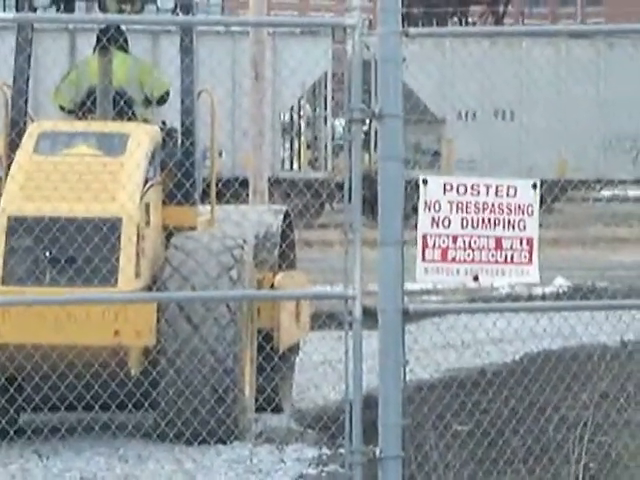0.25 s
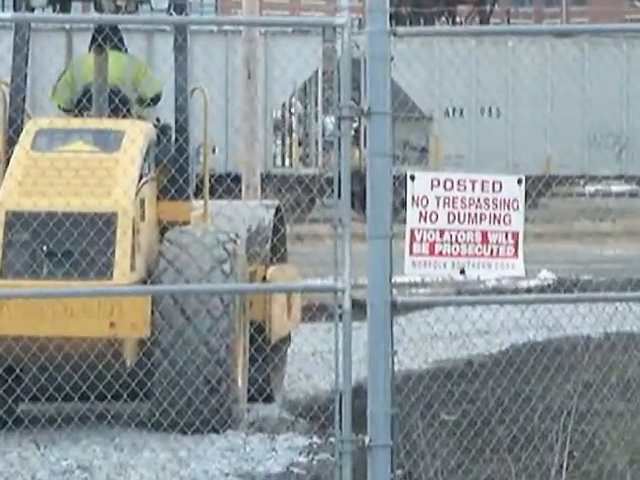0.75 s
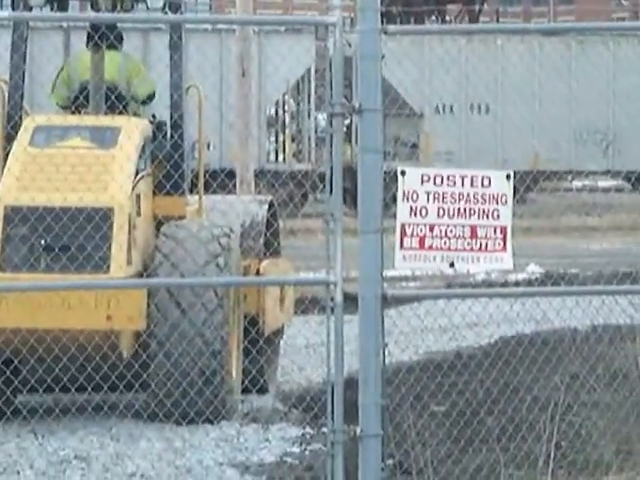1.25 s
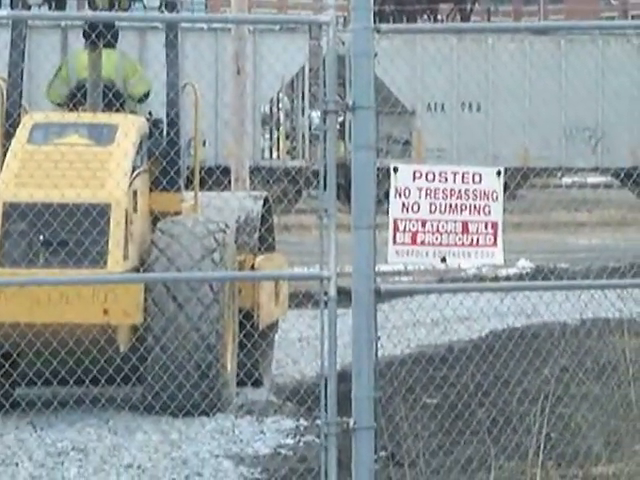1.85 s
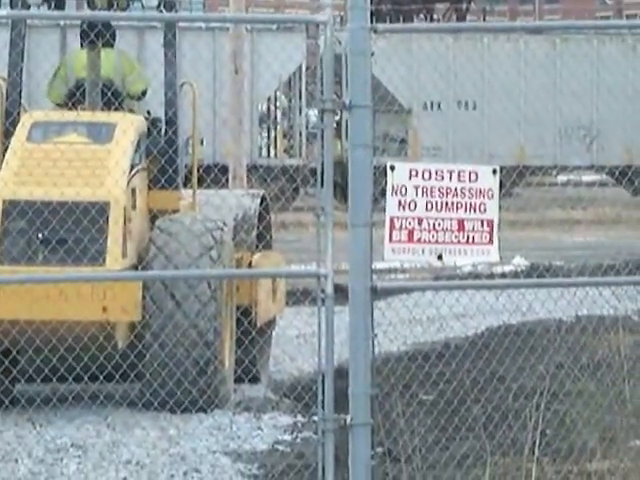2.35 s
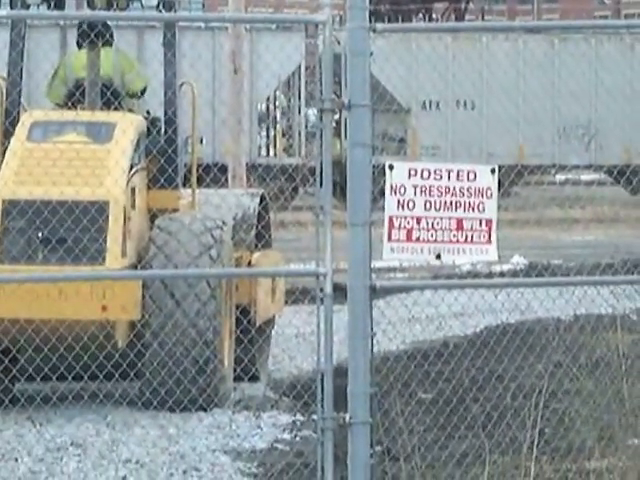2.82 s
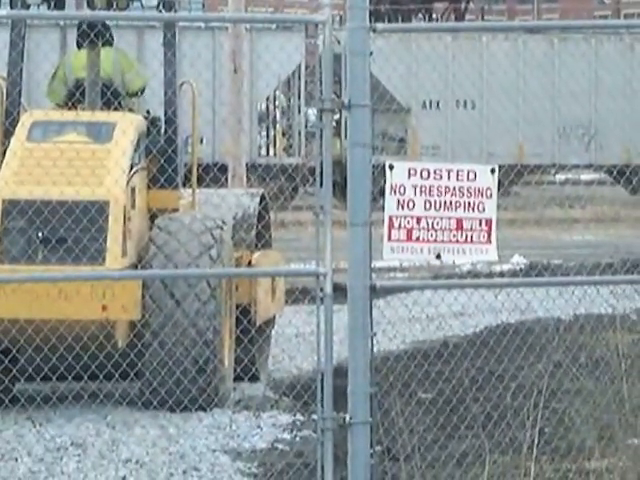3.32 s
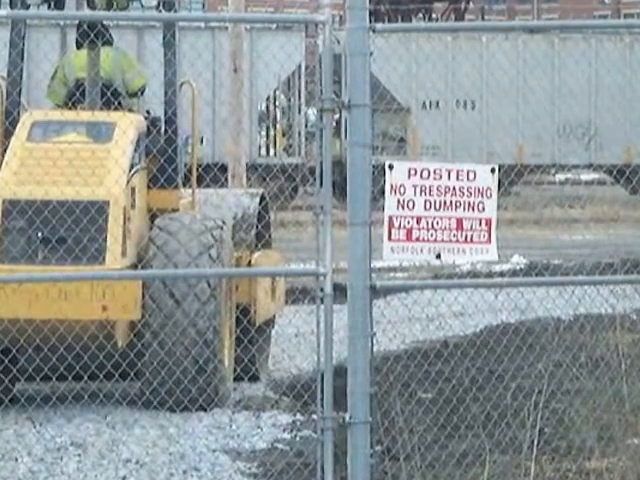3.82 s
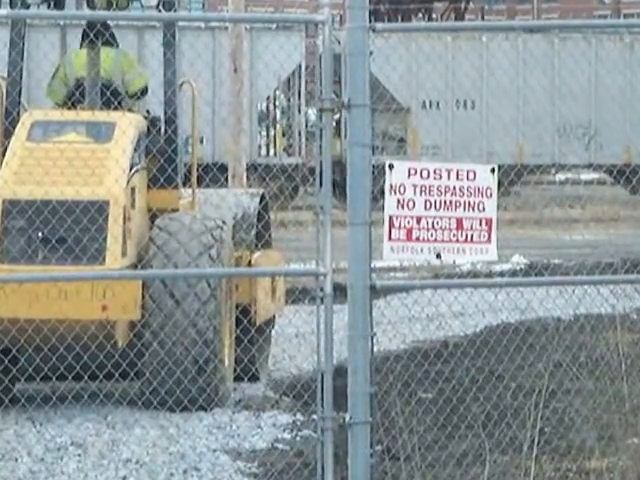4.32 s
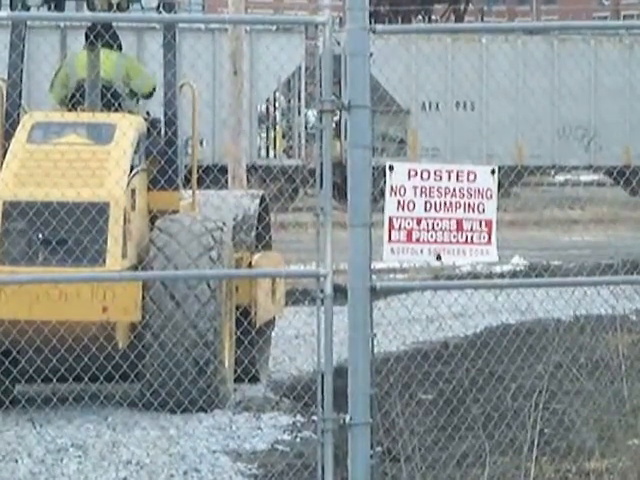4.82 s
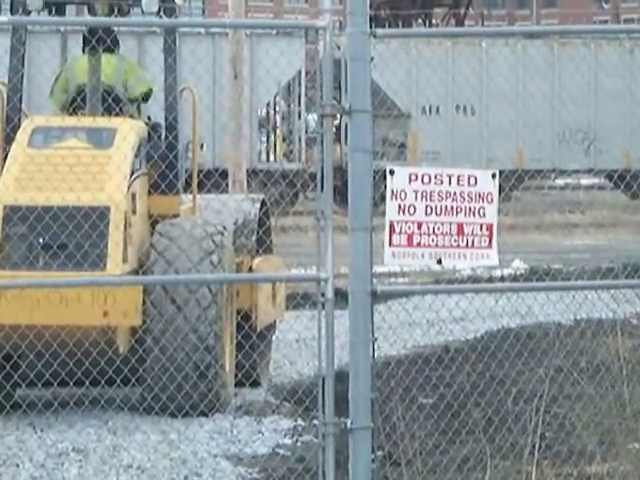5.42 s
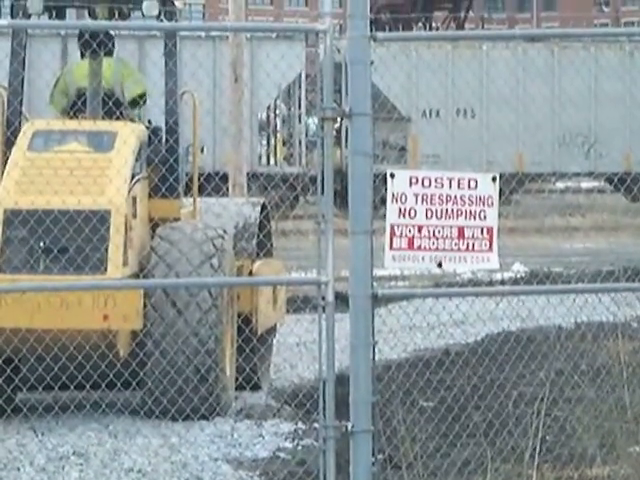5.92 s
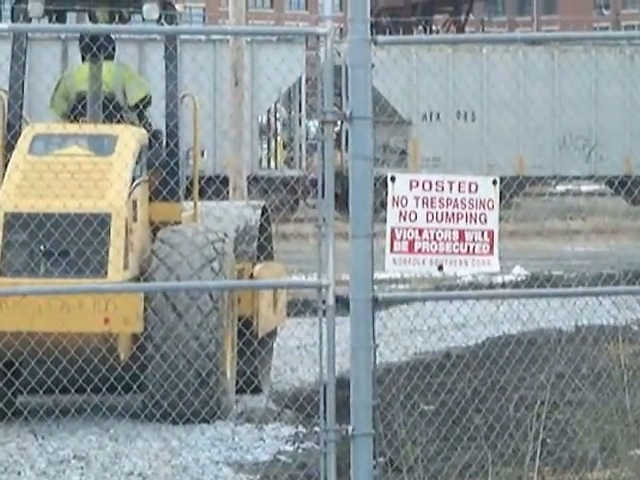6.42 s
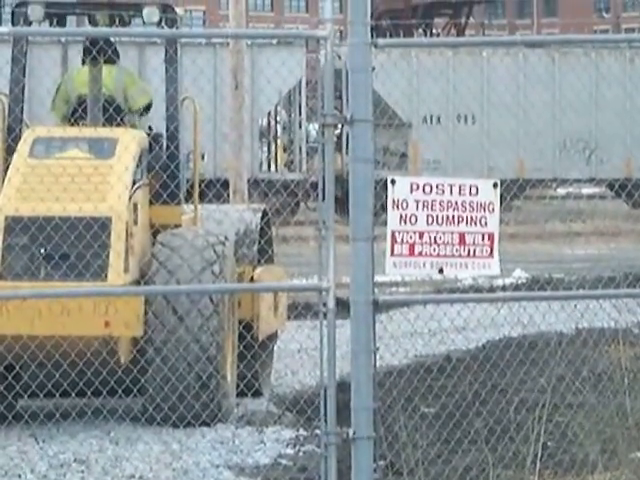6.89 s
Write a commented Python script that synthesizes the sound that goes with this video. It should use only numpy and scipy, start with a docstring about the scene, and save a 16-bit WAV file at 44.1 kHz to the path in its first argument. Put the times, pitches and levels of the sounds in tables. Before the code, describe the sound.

Strong wind rumbles, buffets and thumps against a microphone while a heavy diesel machine idles steadily behind it with a clattering rattle and faint whine.

```python
"""A road roller's four-cylinder diesel idles some way off on an open site as wind buffets the microphone.
Clatter and knocks recur with the engine cycle, over a faint whine of gears and pump locked to the crank. The
wind is shaped noise in three eddy sizes, with gusts, throbbing vortices and sharp slaps; it freshens. The
engine is heard to drop in quick steps and often to climb partly back; some steps leave it louder."""
import sys
import numpy as np
from scipy import signal
from scipy.fft import rfft, irfft, next_fast_len
from scipy.io import wavfile
from scipy.ndimage import uniform_filter1d

SR = 44100
rng = np.random.default_rng(int(sys.argv[2]) if len(sys.argv) > 2 else 0)


def dump(signal):
    """Clip the signal to [-1, 1] and save it as 16-bit WAV at the path in sys.argv[1]."""
    limited = np.clip(np.atleast_2d(signal).T, -1, 1)
    pcm = np.round(limited * 32767).astype(np.int16)
    wavfile.write(sys.argv[1], SR, pcm)


N = 315315
TIME_S = np.arange(N) / SR

# Levels are relative, ahead of normalising and trims.
# mechanical noise spectrum: [f/Hz, level per Hz/dB]
CLATTER_SPECTRUM = [(60, -4.5), (400, -2), (620, 1.5), (900, -5), (1350, -1), (1700, -5.5), (2000, -4.5),
                    (2230, -8), (2550, -1.5), (3200, -7), (3700, -10), (4300, -11), (4650, -20.5),
                    (5800, -18.5), (8000, -30)]
# part of the mechanical noise that recurs in every cycle: [f/Hz, power share/0-1]
RECURRING_SHARE = [(400, 0.6), (900, 0.9), (1400, 0.9), (2000, 0.9), (2700, 0.3), (3700, 0), (6000, 0.05)]
# treble of the mechanical noise: [t/s, level/dB]
TREBLE_CURVE = [(0, -0.3), (1.8, 0), (2.1, -1.2), (3.2, 0), (3.35, 2.5), (3.9, 0.5), (4.25, -1.1), (5.5, 1),
                (7.15, -0.5)]
TREBLE_FROM_HZ = 3300
# knocks of pistons, valves and a loose cover: [place of peak in cycle/0-1, ringing f/Hz, level/dB]
KNOCK_CONTACTS = [(0.135, 1946, -3.5), (0.149, 1685, -4.5), (.205, 2340, 3), (0.234, 2126, -6.5),
                  (0.264, 1647, 2.5), (0.27, 974, 3.5), (.312, 1972, 0.5), (0.312, 1530, -3.5),
                  (0.361, 2580, 0.5), (0.401, 2916, -5), (0.433, 1130, -2), (0.485, 4155, -6),
                  (0.516, 4130, -8), (0.55, 1830, -4), (0.604, 2436, -5), (0.67, 1967, 3.5),
                  (0.681, 3200, -21), (0.689, 1374, 7), (0.81, 1236, -0.5), (0.813, 1750, -1.5),
                  (0.858, 2594, -2.5), (.895, 1863, 0), (.935, 1097, 3.5), (0.945, 1310, 7),
                  (0.95, 2007, 2), (0.959, 1574, -0.5), (0.991, 3270, -13)]
# whine of gears and pump: [multiple of cycle rate/1, level/dB]
WHINE_ORDERS = [(68, -55), (89, -54), (91, -58), (96, -56), (103, -57), (112, -59), (118, -58), (120, -52),
                (131, -57), (132, -57), (136, -58), (140, -57), (141, -57), (143, -56), (144, -55.5),
                (153, -57), (154, -57), (155, -56), (168, -53), (203, -54), (219, -58), (239, -60),
                (258, -59), (259, -58), (267, -52), (268, -58), (279, -53), (287, -52), (294, -61),
                (336, -65), (343, -65), (450, -68)]
# steps in engine level: [t/s, initial loss/dB, lasting loss/dB (negative: louder)]
ENGINE_DIPS = [(-.12, 3.5, 0), (.5, 3.5, 1.24), (1.34, 2.5, 0.5), (1.76, 1, -0.79), (2.93, 0, 2),
               (3.19, 7.5, 3.5), (4.13, 0.5, -2), (4.77, -2, 0.76), (5.33, 6, 2), (6.36, 2, 0),
               (6.76, 1.5, -2)]
ENGINE_DB, DIP_FALL_S, RECOVER_DB_PER_S = -34, 0.093, 6.5
# idle creeps up and wanders
IDLE_RPM, CREEP_RPM_PER_S, HUNT_RPM = 1097.0, .24, .35

# big eddies: [f/Hz, level per Hz/dB]
RUMBLE_SPECTRUM = [(12, -4.5), (25, -4.5), (45, -0.5), (75, -3), (110, -8.5), (200, -42), (400, -76.5)]
# smaller eddies: [f/Hz, level per Hz/dB]
BUFFET_SPECTRUM = [(40, -34.5), (70, -9.5), (110, 4.5), (200, 1.5), (270, -7), (380, -24.5), (700, -50),
                   (2000, -76.5)]
# smallest eddies: [f/Hz, level per Hz/dB]
FLUTTER_SPECTRUM = [(120, -26), (220, -3), (300, -2), (420, -9), (600, -20), (900, -34.5), (1400, -41),
                    (3000, -42.5), (8000, -65)]
# air rasping on the edge of the port: [f/Hz, level per Hz/dB]
RASP_SPECTRUM = [(200, -21), (450, 11.5), (620, 6.5), (800, -1), (1050, -11.5), (1300, -21), (1700, -33.5),
                 (4000, -53)]
# gusts: [start t/s, hold/s, rumble level/dB, buffet level/dB, flutter level/dB]
GUST_EVENTS = [(0, 0.044, -33, -22.5, -27.5), (0.147, 0.19, -24.5, -21, -48),
               (0.421, 0.16, -30, -22.5, -38), (0.74, 0.058, -20, -20, -23.5),
               (.85, 0.025, -29, -20, -24.5), (1.019, 0.16, -31.5, -19.5, -35.5),
               (1.216, 0.16, -38, -19, -21.5), (1.435, 0.025, -29, -17.5, -28),
               (1.795, 0.081, -14.5, -19, -31.5), (1.869, 0.2, -29, -18, -25),
               (2.147, 0.069, -37, -18.5, -46), (2.289, 0.051, -21.5, -18, -28.5),
               (2.448, 0.21, -41, -26, -30), (2.647, 0.29, -27, -19, -27), (2.83, 0.023, -37, -34, -24),
               (2.972, 0.092, -23, -14, -25), (3.11, 0.12, -20, -18.5, -19), (3.29, 0.095, -26, -29, -32),
               (3.46, 0.14, -26, -21, -41), (3.665, 0.042, -20, -25, -38), (4.005, 0.022, -38, -31, -29),
               (4.105, 0.12, -22, -26, -22), (4.3, 0.093, -34, -28, -34), (4.47, 0.068, -31, -29, -24),
               (4.67, 0.18, -23, -19.5, -28), (4.925, 0.065, -38, -20, -29.5),
               (5.073, 0.019, -39, -23, -20), (5.16, 0.07, -40, -16.5, -23.5), (5.28, 0.17, -31, -22, -24),
               (5.628, 0.082, -26, -31, -25), (5.9, 0.22, -26, -24.5, -25),
               (6.035, 0.28, -22.5, -25.5, -24.5), (6.4, 0.23, -29, -26.5, -27),
               (6.677, .24, -22, -33, -23), (6.963, 0.28, -24, -22.5, -22)]
GUST_ATTACK_S, GUST_RELEASE_S = 0.026, 0.062
# drops of the breeze: [middle t/s, Gaussian half length/s, depth/dB]
BREEZE_LULLS = [(0.683, 0.04, 6), (1.532, .045, 3.5), (1.7, 0.026, 4.5), (2.087, .025, 4), (2.5, 0.058, 6),
                (3.423, 0.039, 3.5), (3.864, 0.031, 5.5), (5.556, 0.01, 0), (6.542, 0.019, 11)]
# breeze under the gusts and its growth: rumble, buffet, flutter
BREEZE_DB, FRESHEN_DB_PER_S = (-24, -26, -47), (0.31, 0.7546, 2.5)
# throbbing vortices: [middle t/s, length/s, start f/Hz, end f/Hz, peak level/dB]
VORTEX_EVENTS = [(.175, 0.071, 187, 167, -16), (.39, 0.26, 145, 101, -16), (0.502, .09, 99, 85, -15),
                 (0.561, 0.086, 90.3, 60, -8.5), (1.823, 0.15, 131.7, 97, -8.5),
                 (2.224, 0.068, 97.3, 65, -11.5), (2.71, 0.13, 179, 165, -12.5),
                 (3.015, 0.14, 184, 100.6, -19), (3.236, 0.053, 90.5, 55, -9),
                 (3.383, 0.068, 36.5, 26.2, -11.5), (3.714, .08, 103, 84.5, -9),
                 (4.17, 0.094, 39.7, 34, -9), (4.818, 0.085, 102, 70, -13), (5.205, .1, 243.4, 170, -14.5),
                 (5.32, 0.055, 172, 131, -7), (5.287, 0.051, 89.5, 80, -14), (5.439, .13, 51.7, 47.3, -8.5),
                 (6.355, 0.079, 71, 66, -13), (7.04, 0.087, 64.6, 57, -12)]
# hardest single eddies: [t/s, thump level/dB, thump width/s, rasp level/dB]
SLAP_EVENTS = [(0.451, -2.5, 0.001, -39), (0.503, -6, 0.0013, -38), (0.556, -2.5, 0.0022, -40),
               (.743, -8, 0.00059, -14), (.794, -3.5, 0.001, -26), (.877, -16, 0.00058, -25),
               (1.238, -13, .0006, -14), (1.361, -12, 0.00049, -11), (1.369, -15, .0003, -15),
               (1.376, 1, 0.00069, -33), (1.409, -6, .0006, -18), (1.968, -11, 0.0012, -32),
               (2.19, -3, 0.0011, -25), (2.221, -12, 0.00085, -36), (2.29, -5, 0.0011, -23),
               (2.702, -10, 0.0019, -39), (2.863, -12, 0.00055, -22), (3.013, -2, 0.00088, -32),
               (3.154, -12, 0.00067, -18), (3.175, -4, 0.0007, -20), (3.199, -9, 0.00053, -16),
               (3.218, -17, 0.00041, -16), (3.23, -11, 0.00067, -15), (3.272, -3.5, 0.00081, -14),
               (3.53, -8.5, 0.00092, -34), (4.045, -13.5, .0005, -24), (4.133, -17, .0005, -20),
               (4.165, -4, 0.00094, -9), (4.192, -13, 0.0004, -14.5), (4.238, -14, 0.00028, -21),
               (4.369, -1, 0.0011, -34), (4.477, -30, .0005, -13.5), (4.508, -3, 0.00099, -26),
               (4.538, -9, 0.00056, -14), (4.708, -6.5, .001, -36), (4.832, 0, 0.001, -42),
               (4.851, -5, 0.0013, -33), (4.965, -1.5, 0.00096, -40), (5.054, -1.5, 0.00096, -31),
               (5.11, -7, 0.00035, -10), (5.185, -3, 0.00061, -19), (5.336, -0.5, 0.00062, -18),
               (5.387, -1, 0.00071, -28), (5.624, -17, 0.00045, -23), (5.697, -7, .0009, -21),
               (5.908, -2, 0.00075, -37), (6.116, -6, 0.0018, -13), (6.198, -7.5, 0.00048, -21),
               (6.295, -8, 0.0011, -36), (6.354, -6, 0.00093, -34), (6.826, -3, 0.00086, -21),
               (7.02, -15, .0006, -17), (7.101, -16, 0.00056, -13), (7.111, -4, 0.0011, -11)]

# faint tone of the electronics; upper band limit
ELECTRONIC_TONE_HZ, ELECTRONIC_TONE_DB = 8000, -78
CUTOFF_HZ = 8800


def from_db(db):
    """Decibels to amplitude gain."""
    return 10 ** (np.asarray(db) / 20)


def rms_one(x):
    """Scale to unit power."""
    return x / np.sqrt(np.mean(x ** 2) + 1e-20)


def at_hz(points, hz):
    """Interpolate a table along log frequency."""
    known_hz, values = np.transpose(points)
    return np.interp(np.log(hz + 1e-9), np.log(known_hz), values)


def shaped(x, gain_at):
    """Filter by a gain given as a function of frequency."""
    size = next_fast_len(N)
    hz = np.arange(size // 2 + 1) * SR / size
    return irfft(rfft(x, size) * gain_at(hz), size)[:N]


def spectral_noise(spectrum):
    """Random noise with the amplitude spectrum of a table."""
    return shaped(rng.standard_normal(N), lambda hz: from_db(at_hz(spectrum, hz)))


def drift(rate_hz):
    """Low-passed noise of unit RMS, changing about rate_hz times a second."""
    return rms_one(shaped(rng.standard_normal(N), lambda hz: 1 / (1 + (hz / rate_hz) ** 2) ** 2))


def evened(x, size):
    """Hold power near one over spans of about size samples."""
    power = uniform_filter1d(x ** 2, size=size)
    power = uniform_filter1d(power, size=size * 2 // 3)
    return x / np.sqrt(abs(power) + 1e-12)


def engine():
    """Four-stroke sources share one cycle clock: a cycle takes two turns of the crank."""
    rpm = IDLE_RPM + CREEP_RPM_PER_S * TIME_S + HUNT_RPM * drift(2.02)
    cycles = np.cumsum(rpm) / 120 / SR
    parts = from_db(0.68) * clatter(cycles)
    parts = parts + from_db(-1.0) * knocks(cycles, rpm)
    parts = parts + from_db(-1.5) * whine(cycles)
    return from_db(engine_level_db()) * parts


def engine_level_db():
    """Each step falls quickly, then recovers at a steady rate to its lasting loss."""
    level_db = ENGINE_DB
    for start_s, depth_db, stays_db in ENGINE_DIPS:
        fallen = np.clip((TIME_S - start_s) / DIP_FALL_S, 0, 1)
        regained_db = RECOVER_DB_PER_S * np.maximum(TIME_S - start_s - DIP_FALL_S, 0)
        level_db = level_db - fallen * np.maximum(depth_db - regained_db, stays_db)
    return level_db


def clatter(cycles, firing_db=0.8, firing_place=0.25, uneven_db=0.86, shifting=1.0, tick_db=-0.1, ticks_per_cycle=7):
    """Small contacts recur each cycle, slowly shifting, mixed with ever new combustion noise."""
    recurring = rms_one(cycle_pattern(cycles) + shifting * drift(0.85) * cycle_pattern(cycles))

    def share(hz):
        return np.clip(at_hz(RECURRING_SHARE, hz), 0, 1)

    force = shaped(recurring, lambda hz: np.sqrt(share(hz)))
    force = force + shaped(rng.standard_normal(N), lambda hz: np.sqrt(1 - share(hz)))
    body = shaped(force, lambda hz: from_db(at_hz(CLATTER_SPECTRUM, hz)))

    # four firings per cycle, plus a faster pulse
    firing = np.cos(8 * np.pi * (cycles - firing_place))
    ticking = np.cos(2 * np.pi * ticks_per_cycle * (cycles - firing_place))
    swell_db = firing_db * firing + tick_db * ticking + uneven_db * drift(18)
    noise = rms_one(evened(body, size=SR // 160) * from_db(swell_db))

    treble = shaped(noise, lambda hz: 1 - 1 / (1 + (hz / TREBLE_FROM_HZ) ** 10))
    treble_db = np.interp(TIME_S, *np.transpose(TREBLE_CURVE))
    return noise - treble + treble * from_db(treble_db)


def cycle_pattern(cycles):
    """A rattle repeated every cycle, with random strengths and phases of its orders."""
    size = 4096
    strength, turn = rng.random((2, size // 2 + 1))
    orders = strength * np.exp(2j * np.pi * turn)
    orders[[round(multiple) for multiple, db in WHINE_ORDERS]] = 0  # left to the whine
    return rms_one(np.interp(cycles, np.arange(size) / size, irfft(orders), period=1))


def knocks(cycles, rpm, ring_s=0.00173, sag_per_s=19, rough_rad=0.17, rough_hz=500):
    """Each contact rings roughly and sags in pitch, as its highs die first; force and timing vary by cycle."""
    out, cycle_s = 0, 120 / np.mean(rpm)
    uneven_db, jitter_s = 1.1, 0.00012
    rattle_rad = rough_rad * drift(rough_hz)
    for place, ring_hz, db in KNOCK_CONTACTS:
        # start one ring_s early so the swell peaks at its place
        turn, since = np.divmod(cycles - place + ring_s / cycle_s + 1, 1)
        turn = np.clip(turn, 0, None).astype(int)
        strength, delay = rng.standard_normal((2, turn[-1] + 1))
        age_s = since * cycle_s
        swell = age_s / ring_s * np.exp(1 - age_s / ring_s)
        # ring_hz is reached at 2 * ring_s
        sag_s = sag_per_s * (age_s - 2 * ring_s) ** 2 / 2
        ring_age_s = age_s - sag_s - jitter_s * delay[turn]
        phase = 2 * np.pi * (ring_hz * ring_age_s + rng.random()) + rattle_rad
        out = out + from_db(db + uneven_db * strength)[turn] * swell * np.sin(phase)
    return out


def whine(cycles, flutter_db=1.5, slip_rad=0.23, slip_order=150):
    """Crank-locked tones flutter and waver in moving air; firing throb and phase slip grow with order."""
    out, waver_db, throb_db = 0, 1.3, 1.5
    for multiple, db in WHINE_ORDERS:
        height = multiple / slip_order
        throb = throb_db * height * np.cos(2 * np.pi * (4 * cycles + rng.random()))
        phase = 2 * np.pi * (np.round(multiple) * cycles + rng.random()) + slip_rad * height * drift(32)
        level_db = db + waver_db * drift(3.2) + flutter_db * drift(61) + throb
        out = out + from_db(level_db) * np.sin(phase)
    return rms_one(out)


def wind(swell_db=1.5, swell_hz=12):
    """Big eddies rumble, smaller ones buffet and the smallest flutter; all three share the same lumps."""
    rumble_gain, buffet_gain, flutter_gain = wind_strength()
    lumps = drift(120)
    rumble_trim = from_db(-1.05 + swell_db * drift(swell_hz))
    rumble = rumble_trim * rumble_gain * eddies(RUMBLE_SPECTRUM, lumps, lump_db=1.0)
    buffet = from_db(-2.0) * buffet_gain * eddies(BUFFET_SPECTRUM, lumps, lump_db=3.0)
    flutter = from_db(-1.0) * flutter_gain * eddies(FLUTTER_SPECTRUM, lumps, lump_db=2.5)
    return rumble + buffet + flutter + tearing(flutter_gain) + vortices() + slaps()


def wind_strength():
    """Three eddy gains: lulls lower the growing breeze; gusts rise, hold and fall, adding power."""
    lull_db = sum(depth_db * np.exp(-((TIME_S - mid_s) / half_s) ** 2)
                  for mid_s, half_s, depth_db in BREEZE_LULLS)
    breeze_db = np.array(BREEZE_DB)[:, None] + np.outer(FRESHEN_DB_PER_S, TIME_S) - lull_db
    power = from_db(breeze_db) ** 2
    for start_s, hold_s, *levels_db in GUST_EVENTS:
        end_s = start_s + hold_s
        corners_s = [start_s - GUST_ATTACK_S, start_s, end_s, end_s + GUST_RELEASE_S]
        envelope = np.interp(TIME_S, corners_s, [0, 1, 1, 0])
        power += np.outer(from_db(levels_db), envelope) ** 2
    return np.sqrt(power)


def eddies(spectrum, lumps, lump_db):
    """Turbulent pressure in lumps, its power evened over roughly a tenth of a second."""
    noise = rms_one(spectral_noise(spectrum))
    return evened(noise * from_db(lump_db * lumps), size=SR // 14)


def tearing(flutter_gain, level_db=-30.0, hard_gust_db=-20, steepness=1.7, burst_db=8.0, burst_hz=90):
    """Flow tears at the port in short bursts, growing faster than the flutter and so strongest in hard gusts."""
    force = (flutter_gain / from_db(hard_gust_db)) ** steepness
    bursts = spectral_noise(RASP_SPECTRUM) * from_db(burst_db * drift(burst_hz))
    return from_db(level_db) * force * evened(bursts, size=SR // 14)


def vortices(level_db=-4.0, rough_db=2.0, wobble_rad=0.12):
    """Each passing vortex swells and fades as an unsteady throb, its pitch falling as the air slows."""
    out = np.zeros(N)
    unsteady = from_db(rough_db * drift(60))
    slip_rad = wobble_rad * drift(50)
    turns = rng.random(len(VORTEX_EVENTS))
    for (mid_s, length_s, start_hz, end_hz, db), turn in zip(VORTEX_EVENTS, turns):
        near = abs(TIME_S - mid_s) < length_s / 2
        passed = (TIME_S[near] - mid_s) / length_s + .5
        throb_hz = start_hz + (end_hz - start_hz) * passed
        phase = 2 * np.pi * (np.cumsum(throb_hz) / SR + turn) + slip_rad[near]
        out[near] += from_db(db + level_db) * np.sin(np.pi * passed) ** 2 * np.sin(phase)
    return out * unsteady


def slaps(thump_db=-0.5, rasp_db=-5.5, rasp_s=0.0016):
    """An eddy gives one sharp pressure swing of either sign and a brief rasp on the edge of the port."""
    thumps, bursts = np.zeros(N), np.zeros(N)
    signs = rng.choice([-1, 1], len(SLAP_EVENTS))
    for (mid_s, db, width_s, burst_db), sign in zip(SLAP_EVENTS, signs):
        near = abs(TIME_S - mid_s) < 20 * width_s
        since_s = TIME_S[near] - mid_s
        u = (since_s / width_s) ** 2
        thumps[near] += sign * from_db(db) * (1 - u / 10) / (1 + u / 2) ** 2
        bursts[near] += from_db(burst_db) * np.exp(-.5 * (since_s / rasp_s) ** 2)
    rasp = bursts * evened(spectral_noise(RASP_SPECTRUM), size=SR // 300)
    return from_db(thump_db) * thumps + from_db(rasp_db) * rasp


def scene():
    """The engine heard through the wind, one channel."""
    return (engine() + wind())[None]


def record(dry, level_noise_db=-37, ceiling=1.0):
    """A narrow band-limited channel rounds strong pressure swings, with noise that grows with the signal's size."""
    rounded = ceiling * np.tanh(dry / ceiling)
    level_noise = from_db(level_noise_db) * abs(rounded) * rng.standard_normal(N)
    tone = from_db(ELECTRONIC_TONE_DB) * np.sin(2 * np.pi * ELECTRONIC_TONE_HZ * TIME_S)
    soft_filter = signal.butter(10, 7350, fs=SR, output="sos")
    band_filter = signal.ellip(10, .1, 80, CUTOFF_HZ, fs=SR, output="sos")
    soft = signal.sosfilt(soft_filter, rounded + level_noise)
    return signal.sosfilt(band_filter, soft + tone)


dry = scene()
out = record(dry)
dump(out)
```